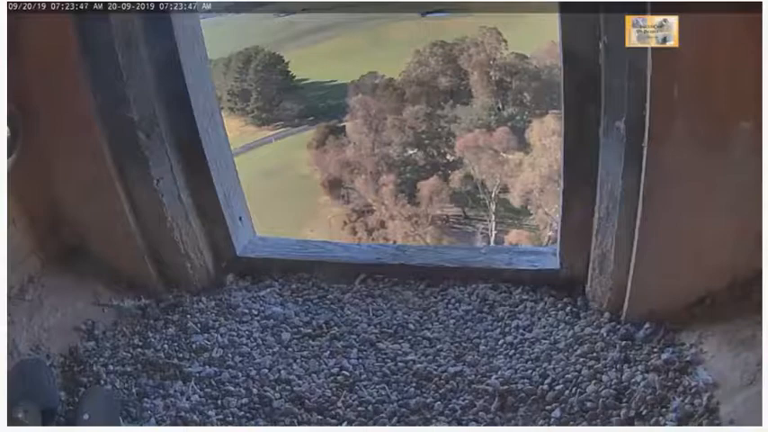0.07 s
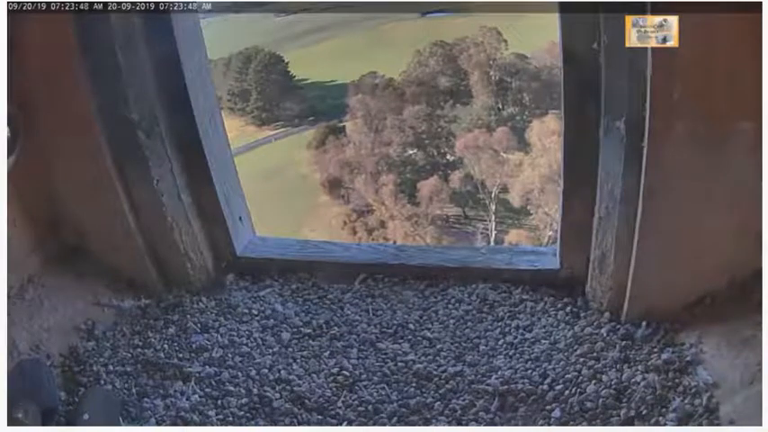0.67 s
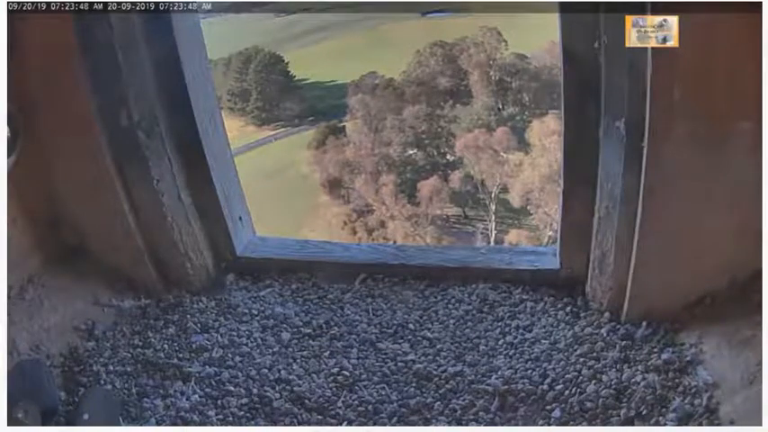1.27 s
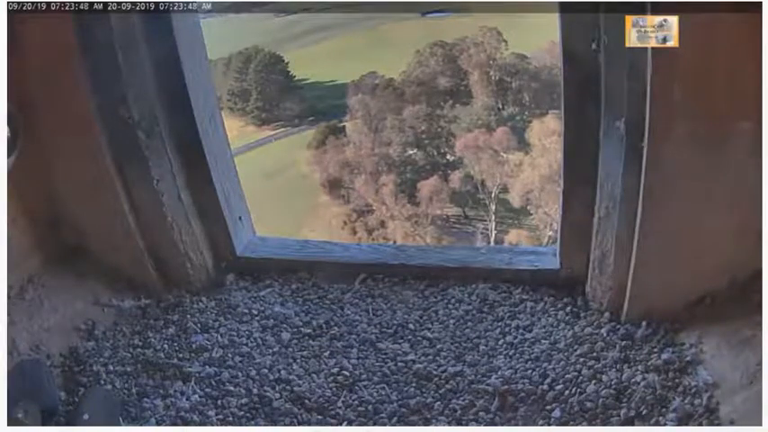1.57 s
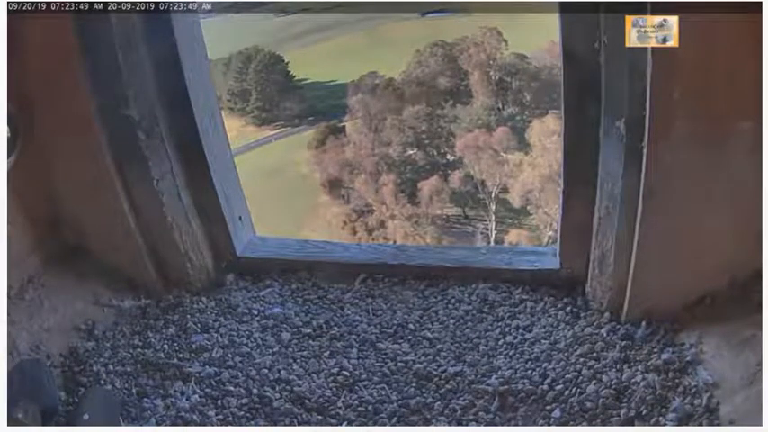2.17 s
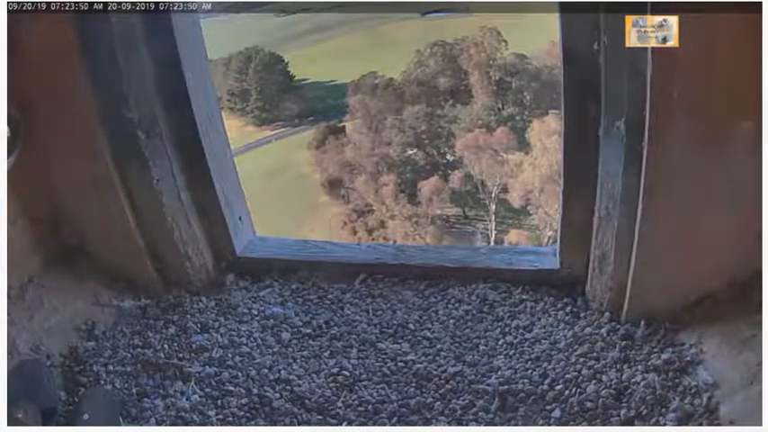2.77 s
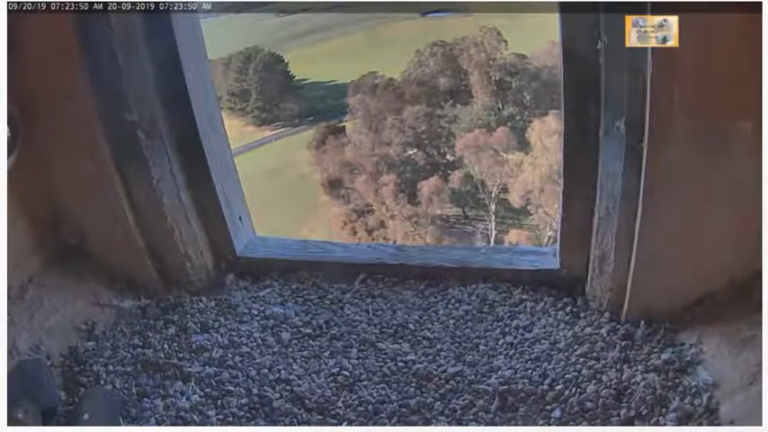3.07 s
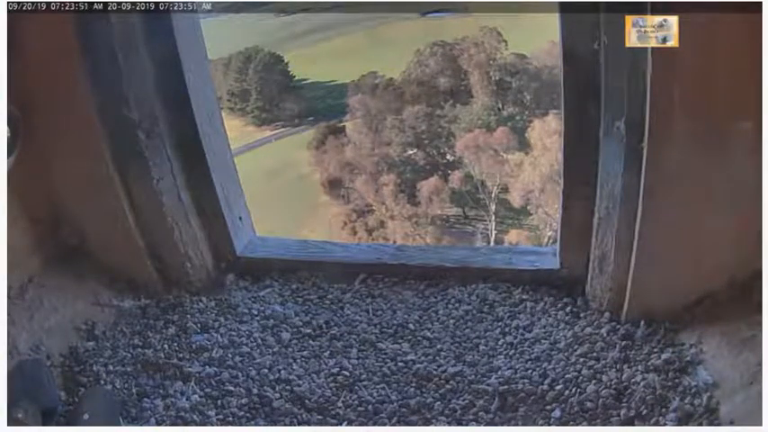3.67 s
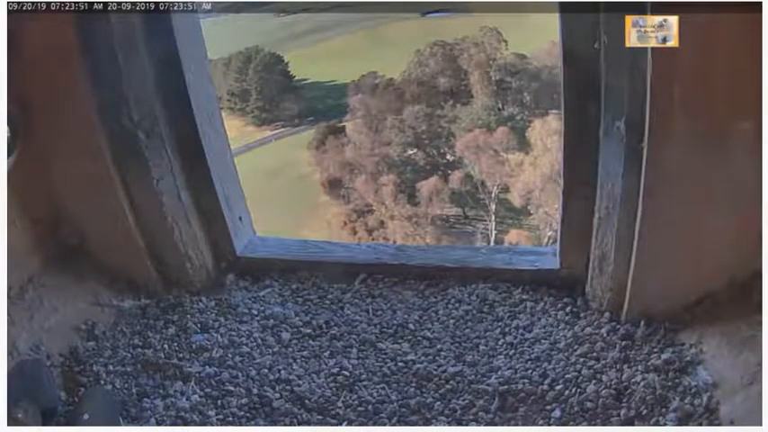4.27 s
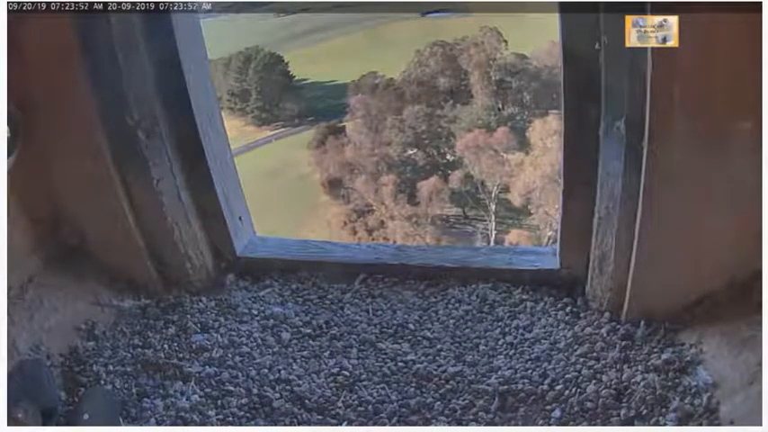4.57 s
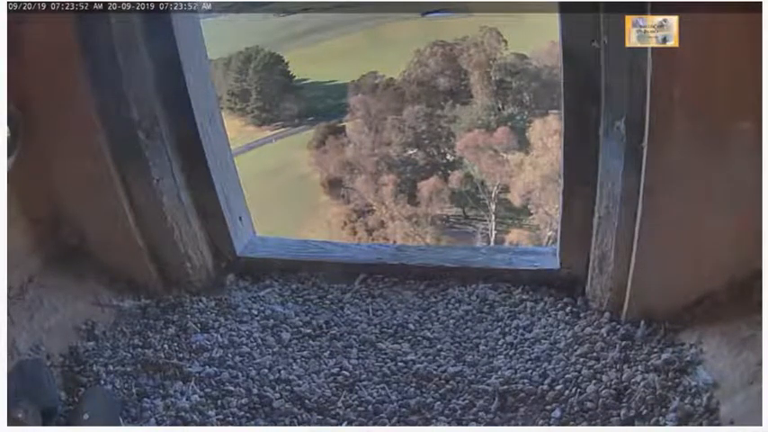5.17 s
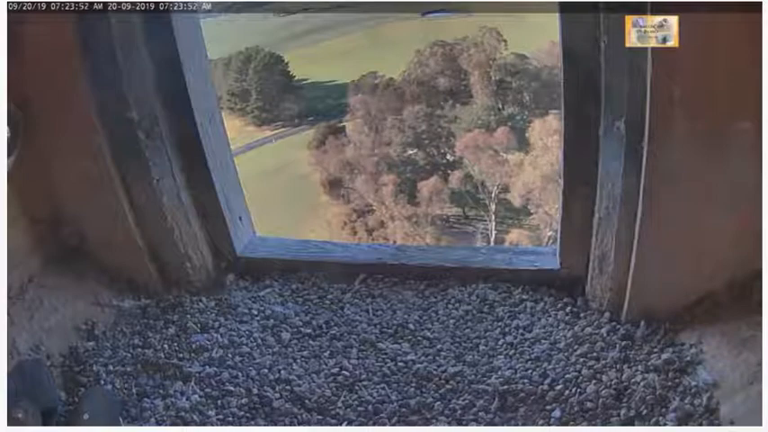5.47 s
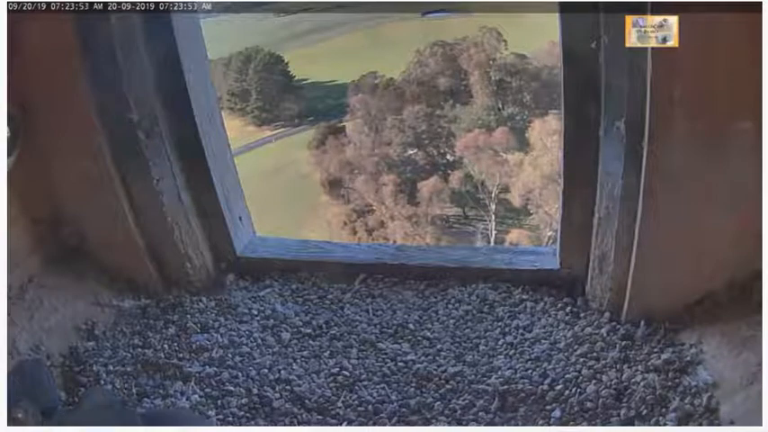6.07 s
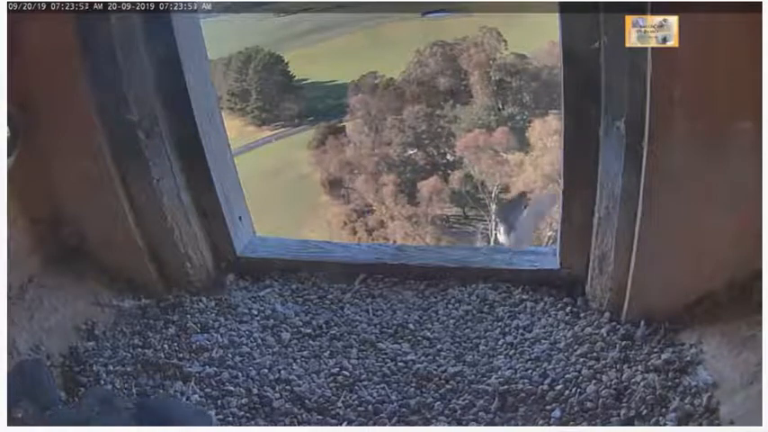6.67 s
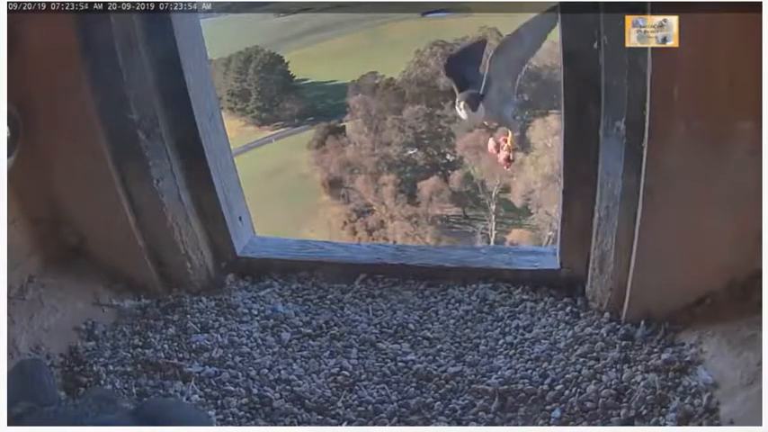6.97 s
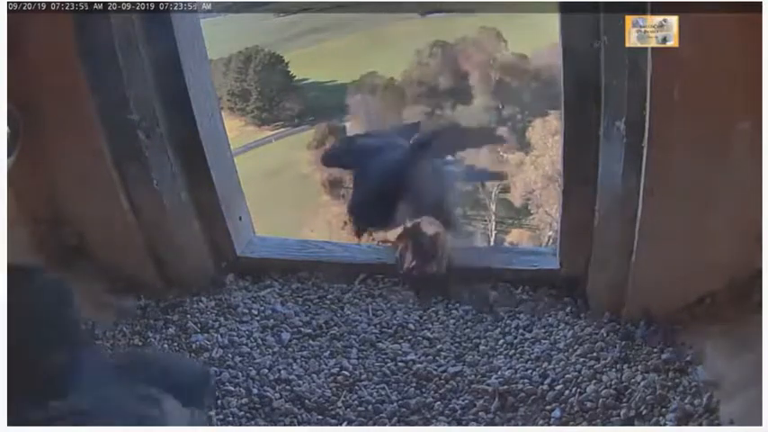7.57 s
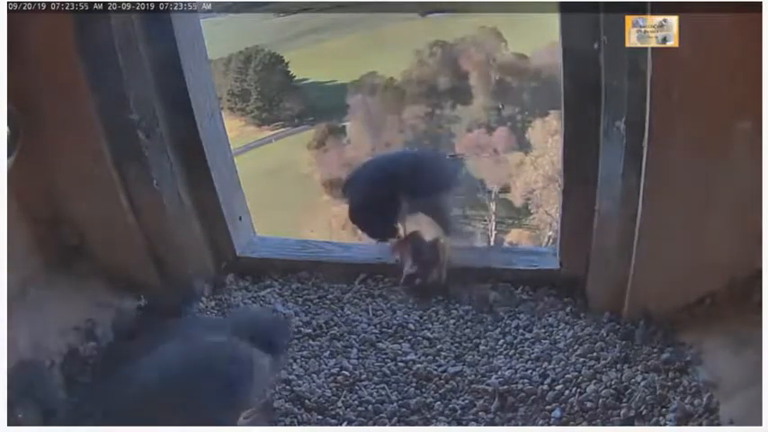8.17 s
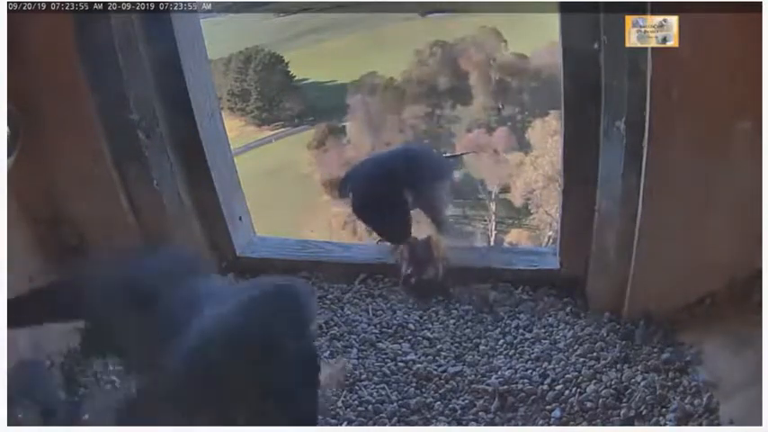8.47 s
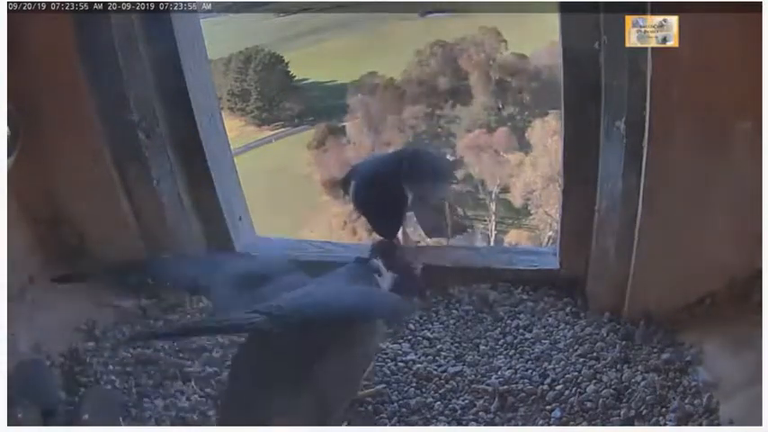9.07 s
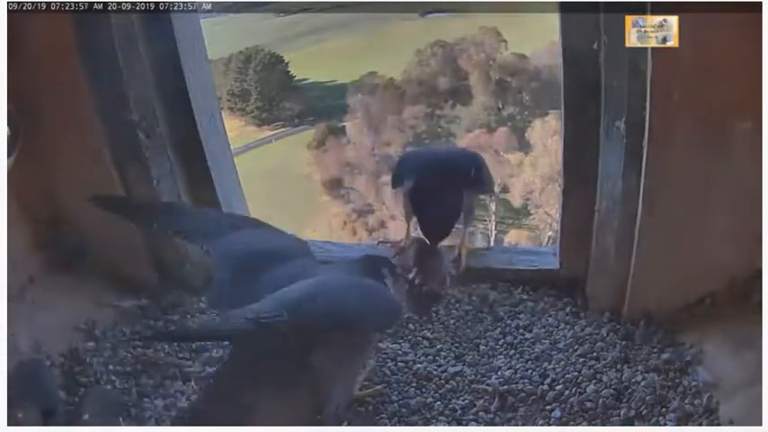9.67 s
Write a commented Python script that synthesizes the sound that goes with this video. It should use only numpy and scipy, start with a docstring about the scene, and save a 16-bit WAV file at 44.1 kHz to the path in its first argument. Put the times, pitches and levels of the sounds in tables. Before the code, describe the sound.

Heard from inside an outdoor nest box, wind rumbles under a thin hiss while a far bird whistles faintly among trees. Well past halfway, a wavering falcon wail grows into a run of yelps, with thumps of wing beats and a hollow landing note. Sharp falling chups, thin squeaks, hoarse grunts and scuffs from two falcons follow close to the microphone, closing with a brief falling squeal.

```python
"""At a nest box among trees, a falcon wails and yelps as its mate flies in and lands; then both trade
harsh, squeaky chups. Each call is a vibration of the syrinx filtered by the throat; many begin or end
in a low gliding grunt, and the modes of the box ring on after them. Wings buffet the microphone with
swells of pressure, hoarse rasps and scuffs come as grainy bursts of noise, and a far bird's whistle
echoes from the trees. Under it all lie wind rumble and hiss."""
import sys
import numpy as np
from scipy import signal
from scipy.fft import rfft, irfft, next_fast_len
from scipy.io import wavfile
from scipy.ndimage import uniform_filter1d

SR = 44100
rng = np.random.default_rng(int(sys.argv[2]) if len(sys.argv) > 2 else 0)


def bounce(signal):
    """Save signal as a 16-bit WAV file at the path given by the first command-line argument."""
    frames = np.transpose(np.atleast_2d(signal))
    limited = np.clip(frames, -1, 1)
    pcm = np.round(limited * 32767).astype(np.int16)
    wavfile.write(sys.argv[1], SR, pcm)


N = 433503
TIME = np.arange(N) / SR


# the long wail: (time [s], pitch [Hz], level [dB], overtones [dB], roughness [0-1])
WAIL = [(6.62, 1116, -50, 1, 0.2), (6.636, 1124, -39.5, -12, 0.2), (6.692, 1063, -48, 5.5, .22),
        (6.71, 1119, -41, -13.5, 0.3), (6.722, 1138, -62.5, 7, 0.5), (6.742, 1089, -36.5, -5.5, .05),
        (6.81, 1082, -45, 7, .24), (6.85, 1109, -31, -10, .13), (6.89, 1088, -36.5, 6, .15),
        (6.96, 1095, -33.5, 3, 0.19), (6.98, 1153, -26.5, -11, 0.01), (7.004, 1161, -29.5, -5.5, 0.1),
        (7.018, 1282, -36.5, 3, 0.1), (7.036, 1095, -28, 1, .05), (7.05, 1072, -39, 3, .15)]
# yelps: (start [s], crest [s], pitch [Hz], final lift [share of pitch], held level [dB],
# added crest [dB], overtones [dB], roughness [0-1])
YELPS = [(7.155, 7.259, 1112, .18, -31.5, -18.5, 0, .16), (7.309, 7.359, 1097, 0.19, -33, -23.5, 2, .17),
         (7.412, 7.432, 1109, 0.053, -33.5, -35, -10, .18), (7.513, 7.54, 1189, -.08, -34, -33, -9.5, 0.1),
         (7.543, 7.573, 1096, 0.089, -35.5, -27.5, 0.5, 0.3),
         (7.644, 7.688, 1096, .14, -36.5, -24.5, 5, .2), (7.755, 7.783, 1093, .14, -35, -25.5, 6.5, 0.26),
         (7.852, 7.869, 1105, .018, -34, -40.5, 8, 0.3), (8.052, 8.073, 1208, .076, -34.5, -42.5, 2.5, .25),
         (8.365, 8.399, 1153, 0.19, -31, -36, 1.5, 0.33), (9.131, 9.153, 1221, .06, -40.5, -35, 10.5, 0.2)]
# faint wails: (start [s], length [s], first pitch [Hz], last pitch [Hz], level [dB], roughness [0-1])
APPROACH_WAILS = [(6.266, 0.15, 1006, 1044, -54.5, .13), (6.419, 0.1, 990, 1022, -53, 0.4)]
# spectra of the throat and of its rasp: (frequency [Hz], gain [dB])
WAIL_THROAT = [(2000, -8), (2350, -10.5), (2900, -11.5), (3300, -27.5), (3650, -13.5), (4000, -26.5),
               (4500, -7.5), (5500, -28), (6600, -19), (7600, -60.5)]
WAIL_RASP = [(700, -11), (950, -19.5), (1300, 15), (1700, -6), (1950, -0.5), (2400, 10), (3000, 0.5),
             (3500, -4), (4000, 2), (4600, -2.5), (5100, -19), (5700, -1.5), (6700, -5), (7800, -30)]
def wails():
    """Biphonation: the two sides of the syrinx sing different pitches, making wails and yelps harsh."""
    approach = [sweep(*row, bright_db=1.5, settle=.41, crest=.98, ends_db=-9.5, fray=.24)
                for row in APPROACH_WAILS]
    faint = syrinx(approach, WAIL_THROAT, jitter=.034, flutter_hz=150, rasp_db=-7, edge_s=.0081,
                   second_db=-4)
    calls = [WAIL] + [yelp(*row) for row in YELPS]
    loud = syrinx(calls, WAIL_THROAT, jitter=.034, flutter_hz=200, rasp_db=2, edge_s=.008,
                  second_db=-21, rasp_colour=WAIL_RASP, stutter=.45)
    return ragged(faint + loud, patch_db=2.5)


def yelp(start, crest_s, hz, lift, held_db, crest_db, bright_db, rough, scoop=.13, end_s=.02):
    """Pitch and amplitude contour: a yelp scoops down to a note, brightens, swells, flips and frays."""
    s = np.linspace(start, crest_s + end_s, 60)
    onset = np.exp(-(s - start) / .01088)
    ending = np.clip((s - crest_s) / end_s, 0, 1)
    flip = .5 + .5 * np.tanh((s - crest_s - .0012) / .012)
    swell_db = 20 * np.log10(1 + amp(crest_db - held_db) * np.exp(-((s - crest_s) / .0068) ** 2))
    db = held_db + swell_db - 12.5 * (np.exp(-(s - start) / .0037) + ending ** 2)
    overtones_db = bright_db - .09 * swell_db - 15.5 * onset  # the crest favours the fundamental
    pitch = hz * (1 + scoop * onset + lift * flip)
    return np.c_[s, pitch, db, overtones_db, rough + .63 * (onset / 4 + ending)]


# chups: (start [s], length [s], first pitch [Hz], last pitch [Hz], level [dB], roughness [0-1],
# overtones [dB], easing [0 = even glide])
CHUPS = [(7.435, 0.036, 2290, 2040, -30, 0.2, -4.5, 0.89), (7.909, 0.018, 4864, 3525, -15, 0.15, 1, 3.2),
         (7.922, 0.017, 2515, 2288, -22, 0.1, -0.5, 1.4), (8.075, 0.028, 3640, 2930, -35.5, 0.4, 10.5, 1.2),
         (8.123, 0.021, 4790, 4300, -15, 0.13, -5, 2.1), (8.138, 0.022, 2812, 2508, -17, 0.04, -7, 1.8),
         (8.45, 0.0072, 5070, 4850, -20.5, 0.07, -13, 0.67), (8.454, 0.034, 3020, 2549, -20.5, 0.08, 7, 1),
         (8.532, 0.041, 3480, 3174, -41.5, 0.7, 4, 1.1), (8.788, 0.016, 3680, 3000, -34.5, 0.3, 10.5, 1.1),
         (8.802, .028, 2780, 2403, -19, .09, 3, 0.99), (8.971, 0.034, 3336, 2792, -32.5, 0.2, 14, 0.42),
         (9.133, 0.024, 2610, 2802, -25.5, 0.08, -11, 0.84), (9.331, 0.023, 4980, 3620, -19.5, 0.25, 0, 2),
         (9.345, 0.028, 2583, 2317, -23.5, 0.16, -3, 1.7)]
# thin squeaks: (start [s], length [s], first pitch [Hz], last pitch [Hz], level [dB], roughness [0-1])
SQUEAKS = [(4.865, 0.046, 2580, 2620, -68, .3), (7.882, 0.012, 5580, 5680, -26.5, 0),
           (8.385, 0.048, 4980, 5460, -35, 0.2), (8.736, 0.049, 4870, 5240, -40.5, .15),
           (8.765, 0.038, 3680, 3850, -33.5, 0.1), (8.951, 0.013, 3570, 3900, -38, 0.1),
           (9.154, 0.062, 4950, 5000, -29.5, 0), (9.213, 0.023, 4980, 5350, -42.5, 0),
           (9.228, 0.027, 5660, 5610, -38.5, .05), (9.736, 0.0099, 5650, 5580, -33, 0),
           (9.75, 0.044, 4950, 5210, -36, 0.06), (9.794, 0.014, 5490, 5500, -36, 0)]
# throat response: (frequency [Hz], gain [dB])
CHUP_THROAT = [(4700, -1), (5700, -4.5), (6400, -15.5), (7100, -6.5), (7600, -25.5), (9000, -48)]
def chups(chips_from_s=1.835, chips_every_s=.2):
    """Fast frequency sweeps: mostly falling chups, mostly rising squeaks and faint regular chips."""
    falls = [sweep(*row, crest=.54, ends_db=-12, fray=.36, dull_db=-8) for row in CHUPS]
    squeaks = [sweep(*row, bright_db=-19, settle=.27, crest=.17, ends_db=0, fray=.12) for row in SQUEAKS]
    chips = [sweep(chips_from_s + k * chips_every_s, length=.014, first_hz=4420, last_hz=4010, db=db,
                   rough=.43, bright_db=-30, settle=1.3, crest=.35, ends_db=7, fray=.2)
             for k, db in enumerate(rng.normal(-70.5, 7.5, 13))]
    return syrinx(falls + squeaks + chips, CHUP_THROAT, jitter=.055, flutter_hz=376, rasp_db=-4.5,
                  edge_s=.0041, stutter=.8)


# breaks of the voice in a chup: (start [s], length [s], first pitch [Hz], last pitch [Hz], level [dB])
CRACKS = [(7.904, 0.011, 5400, 4800, -28.5), (7.9168, .006, 4100, 3760, -20),
          (8.124, 0.0061, 5730, 5150, -28), (8.14, 0.011, 5600, 5120, -21.5),
          (8.799, 0.014, 5420, 5070, -23), (8.963, 0.011, 5200, 4900, -34), (8.983, 0.017, 4530, 3800, -35),
          (9.147, 0.011, 5100, 6000, -33.5), (9.331, 0.0072, 5820, 4670, -26.5)]
def cracks(snaps_per_s=1100, snap_s=.0018, scatter=.063, uneven_db=2):
    """Impulse excitation: the syrinx rattles in irregular snaps, each ringing near a gliding pitch."""
    out = np.zeros(N)
    for s, length, first_hz, last_hz, db in CRACKS:
        t = np.arange(0, length + 4 * snap_s, 1 / SR)
        count = max(round(length * snaps_per_s), 1)
        late, detune, size = rng.standard_normal((count, 3)).T[:, :, None]
        progress = np.clip((np.arange(count)[:, None] + np.tanh(late) / 2) / count, 0, 1)
        age = np.maximum(t - progress * length, 0)
        hz = first_hz * (last_hz / first_hz) ** progress * (1 + scatter * detune)
        snaps = amp(uneven_db * size) * age * np.exp(-2 * age / snap_s) * np.sin(2 * np.pi * hz * age)
        add(out, s, amp(db) * unit(snaps.sum(0)) * np.sqrt(length / t[-1]))
    return out


# the closing squeal: (time [s], pitch [Hz], level [dB], overtones [dB], roughness [0-1])
SQUEAL = [(9.694, 1335, -24, -15, 0.1), (9.712, 1243, -20.5, 8, 0.11), (9.735, 1227, -30.5, 3, 0),
          (9.75, 1124, -37, 3, 0.16), (9.765, 1126, -48, -2, 0)]
# throat response: (frequency [Hz], gain [dB])
SQUEAL_THROAT = [(2400, -34.5), (3700, -25), (4900, -15), (5250, -23), (5600, 12.5), (6200, -12.5),
                 (7300, -19), (8000, -62)]
def squeal():
    """Formant filtering: a sharp throat resonance picks out high overtones of a falling note."""
    return syrinx([SQUEAL], SQUEAL_THROAT, jitter=.015, flutter_hz=250, rasp_db=-10, edge_s=.0065)


# croaks: (start [s], length [s], first pitch [Hz], last pitch [Hz], level [dB], roughness [0-1],
# overtones [dB])
CROAKS = [(7.262, 0.023, 623, 513, -43.5, 0.3, -5.5), (7.357, .024, 646, 536, -39, 0.3, -4.5),
          (7.577, 0.023, 591.5, 532, -45.5, 0.4, 7), (7.692, .03, 594, 524, -45.5, 0.1, 5),
          (7.784, .034, 638, 531.5, -42.5, .3, 3.5), (7.929, .018, 685, 555, -41, 0.4, 5),
          (8.158, .018, 606, 562, -47.5, 0.4, 0.5), (8.486, 0.018, 695, 531, -41.5, 0.4, 1),
          (8.708, 0.018, 960, 1040, -39, 0.3, -8), (8.802, .03, 1354, 1178, -31.5, 0.3, -11.5),
          (8.986, 0.02, 1412, 1340, -39, .2, -15), (9.129, .018, 466, 565, -50, 0.3, 4),
          (9.675, .019, 460, 628, -36.5, 0.4, 0)]
# throat response: (frequency [Hz], gain [dB])
CROAK_THROAT = [(900, 10), (1250, 1), (1450, 3.5), (1660, 9), (1900, -3.5), (2400, -2.5), (3600, -8.5),
                (5000, -6), (7600, -25.5)]
def croaks():
    """Register change: the voice drops into a hoarse low vibration at the edge of a call."""
    calls = [sweep(*row, settle=.89, crest=.22, ends_db=-8.5, fray=.13) for row in CROAKS]
    return syrinx(calls, CROAK_THROAT, jitter=.081, flutter_hz=120, rasp_db=-12, edge_s=.006)


def sweep(start, length, first_hz, last_hz, db, rough, bright_db, settle, crest, ends_db, fray,
          dull_db=0):
    """Eased frequency glide; away from the crest, the level shifts by ends_db and roughness grows."""
    progress = np.linspace(0, 1, 30)
    crest = np.clip(crest, .1, .9)
    glide = np.expm1(-settle * progress) / np.expm1(-settle)
    hz = first_hz * (last_hz / first_hz) ** glide
    away = np.maximum(1 - progress / crest, (progress - crest) / (1 - crest)) ** 2
    overtones_db = bright_db + dull_db * (progress - .5)
    return np.c_[start + length * progress, hz, db + ends_db * away, overtones_db, rough + fray * away]


# spectrum of rasping air: (frequency [Hz], gain [dB])
RASP = [(700, 0), (950, -19.5), (1300, 10.5), (1700, -17.5), (1950, -15.5), (2400, -2), (2850, 2),
        (3500, -0.5), (4000, -8), (4600, -0.5), (5100, -14), (5700, 9), (7000, -2), (7800, -31.5)]
def syrinx(calls, throat, jitter, flutter_hz, rasp_db, edge_s, second_db=-np.inf, rasp_colour=RASP,
           stutter=0, stutter_hz=170):
    """Source and filter: the throat shapes a harmonic tone; roughness shakes it and adds a rasp."""
    out, air = np.zeros(N), ragged(noise(rasp_colour))
    for rows in calls:
        s, *columns = np.transpose(rows)
        t = np.arange(s[0] - edge_s / 2, s[-1] + edge_s / 2, 1 / SR)
        size = len(t)
        hz, db, bright_db, rough = (np.interp(t, s, c) for c in columns)
        rough = np.clip(rough, 0, 1)
        quaver = .04 * rough * wander(size, 70)
        phase = phase_of(hz * (1 + quaver + jitter * rough * wander(size, flutter_hz)))
        two_voices = 1 + amp(second_db) * np.exp(.25j * phase)  # the other side sings 25% higher
        tone, power = np.zeros((2, size))
        for k in range(1, 8):
            gain = 1 if k == 1 else amp(bright_db) * colour(throat, k * hz) * (k * hz < SR / 4)
            shake = (wander(size, flutter_hz) + 1j * wander(size, flutter_hz)) / np.sqrt(2)
            hoarse = np.minimum(rough * np.sqrt(k), 1)  # high overtones break up first
            strength = np.sqrt(1 - hoarse ** 2) + hoarse * shake
            tone += np.sqrt(2) * gain * (strength * two_voices * np.exp(1j * k * phase)).real
            power += gain ** 2
        puffs = (1 + .5 * np.cos(phase)) * np.resize(air[int(s[0] * SR):], size)
        rasp = amp(rasp_db) * rough * np.sqrt(power) * puffs
        fade = np.sin(np.pi / 2 * np.clip(np.minimum(t - t[0], t[-1] - t) / edge_s, 0, 1)) ** 2
        spurt_phase = phase_of(stutter_hz * (1 + .35 * wander(size, stutter_hz)))
        spurts = unit(1 + np.minimum(stutter * rough, 1) * np.cos(spurt_phase))
        add(out, t[0], amp(db) * fade * spurts * (tone + rasp))
    return out


# rising and falling grunts: (middle [s], length [s], pitch [Hz], level [dB])
WIND_UPS = [(7.656, 0.037, 244.6, -28), (7.763, .03, 277.5, -26.5), (7.838, 0.07, 273.4, -24),
            (8.056, .021, 287, -30), (8.343, .045, 261, -22), (8.753, .035, 270, -18.5),
            (9.135, .026, 372, -31), (9.329, 0.026, 266, -12), (9.68, .022, 444, -24.5)]
RUN_DOWNS = [(7.588, 0.031, 304, -28.5), (7.616, 0.055, 302, -27.5), (7.711, 0.04, 305, -26.5),
             (7.807, .019, 277, -23), (7.916, 0.039, 200, -17.5), (8.123, 0.029, 239.6, -17),
             (8.411, 0.065, 232, -17.5), (8.502, .033, 310, -25), (8.572, .038, 236, -19),
             (8.838, .062, 225.5, -16), (9.021, 0.05, 237, -18), (9.383, 0.069, 307, -23),
             (9.404, 0.056, 248, -15)]
# throat response: (frequency [Hz], gain [dB])
GRUNT_THROAT = [(300, -54), (700, -18.5), (1250, 10), (1650, -9), (2100, -8.5), (6000, 0), (8000, -34.5)]
def grunts(up_octaves=.52, down_octaves=-1.4, overtones_db=-27, air_db=-28, peak_db=7):
    """Slack, uneven vibration speeds up into a call or runs down after it, releasing puffs of air."""
    out, air = np.zeros(N), noise(GRUNT_THROAT)
    for table, octaves in (WIND_UPS, up_octaves), (RUN_DOWNS, down_octaves):
        for s, length, hz, db in table:
            size = int(length * SR)
            glide = octaves * np.linspace(-.5, .5, size) + .13 * wander(size, 92)
            phase = phase_of(hz * 2 ** glide)
            overtones = sum(colour(GRUNT_THROAT, k * hz) * (1 + .5 * wander(size, 120))
                            * np.sin(k * phase) for k in range(2, 10))
            swell = np.hanning(size) * amp(peak_db * (np.bartlett(size) - .97))
            puffs = unit((1 + .5 * np.cos(phase)) * np.resize(air[int(s * SR):], size))
            voice = np.sqrt(2) * np.sin(phase) + amp(overtones_db) * unit(overtones) + amp(air_db) * puffs
            add(out, s - length / 2, amp(db) * swell * voice)
    return out


# pushes of air: (middle [s], length [s], pitch [Hz], level [dB])
BUFFETS = [(7.326, .07, 38.2, -19), (7.37, 0.038, 42.4, -29), (7.413, .03, 181, -24.5),
           (7.43, .13, 181.3, -27), (7.464, .045, 276, -33.5), (7.519, .04, 277.6, -29),
           (7.437, .11, 52.4, -27), (7.59, .1, 49.5, -26.5), (7.288, .14, 119.3, -31.5),
           (7.558, .045, 187.6, -26.5), (7.74, 0.18, 144.8, -41)]
def buffets(unevenness=.27):
    """Air displacement: wing beats and the landing make short, uneven swells of pressure."""
    out = np.zeros(N)
    for s, length, hz, db in BUFFETS:
        size = int(length * SR)
        phase = phase_of(hz * (1 + unevenness * wander(size, hz)))
        add(out, s - length / 2, amp(db) * np.sqrt(2) * np.hanning(size) * np.sin(phase))
    return out


def landing(middle_s=7.302, length_s=.048, hz=289.6, db=-19):
    """A tone burst: one short hollow note as the bird touches down."""
    t = TIME - middle_s
    swell = np.cos(np.pi * np.clip(t / length_s, -.5, .5)) ** 2
    return amp(db) * np.sqrt(2) * swell * np.sin(2 * np.pi * hz * t)


# short bursts of noise: (middle [s], length [s], level [dB])
BURSTS = [(4.904, 0.15, -64), (7.292, 0.1, -34.5), (7.802, .022, -32.5), (7.941, 0.036, -33.5),
          (8.103, 0.026, -29), (8.169, 0.028, -30.5), (8.345, .03, -37), (8.503, 0.025, -32.5),
          (8.56, 0.097, -40), (8.757, .04, -41), (8.817, 0.058, -32.5), (9.013, .06, -36),
          (9.377, .08, -31.5)]
# their spectrum: (frequency [Hz], gain [dB])
BURST_COLOUR = [(100, -21.5), (300, 13), (750, -6.5), (1300, 8), (1660, 3), (2000, 3), (2600, 4),
                (3200, -11.5), (3700, 0.5), (4200, -13.5), (5600, -13), (6900, -14.5), (7800, -37)]
def rasps_and_scuffs(grain_db=2):
    """Gated broadband noise: short grainy bursts, heard as hoarse rasps at the calls and as scuffs."""
    envelope = np.zeros(N)
    for s, length, db in BURSTS:
        add(envelope, s - length / 2, amp(db) * np.hanning(int(length * SR)))
    return envelope * ragged(noise(BURST_COLOUR)) * unit(amp(grain_db * wander(N, 280)))


# response of the box: (frequency [Hz], gain [dB])
BOX_COLOUR = [(500, 2.5), (780, -15), (950, -11), (1100, 0.5), (1400, -2), (1660, -3), (1900, -14.5),
              (2300, -2), (7000, 3), (7700, -9.5)]
# its modes: (frequency [Hz], width [Hz], gain [dB])
BOX_MODES = [(1270, 290, -4.5), (1640, 77, -2.5), (2433, 210, 0.5), (2720, 260, -1), (3044, 73, 16.5),
             (3620, 210, 1.5), (3900, 170, -9), (4570, 170, -6.5), (4950, 110, -9.5), (5650, 260, 2)]
# first wall reflections: (delay [s], gain [ratio])
BOUNCES = [(.0019, -0.096), (.0043, 0.035), (.0074, .17), (0.01, -0.16)]
def box(x, ring_db=-10, ring_t60=1.0, walls_db=-13, walls_t60=.0043):
    """Reflection and resonance: close walls colour and smear a sound, and narrow modes ring on."""
    x = filtered(x, BOX_COLOUR)
    t, f = np.arange(SR) / SR, np.fft.rfftfreq(SR, 1 / SR)
    tail = unit(rng.standard_normal(SR) * amp(-60 * t / ring_t60)) / np.sqrt(SR)
    ring = irfft(rfft(tail) * peaks(BOX_MODES, f), SR) * (1 - t)
    walls = unit(rng.standard_normal(SR) * (t > .002) * amp(-60 * t / walls_t60)) / np.sqrt(SR)
    echo = amp(ring_db) * ring + amp(walls_db) * walls
    for s, gain in BOUNCES:
        add(echo, s, np.array([gain]))
    return x + signal.fftconvolve(x, echo)[:N]


def boom(x, db=-9, hz=185, t60=.044):
    """Cavity resonance: the air in the box swings in its lowest mode."""
    t = np.arange(SR // 2) / SR
    decay = amp(-60 * t / t60)
    mode = 2 * decay / decay.sum() * np.cos(2 * np.pi * hz * t)
    return x + amp(db) * signal.fftconvolve(x, mode)[:N]


# spectrum of the click: (frequency [Hz], gain [dB])
TICK_COLOUR = [(300, 3), (1000, 2), (3000, -12), (7000, -17)]
def tick(time_s=5.145):
    """A filtered impulse: one small dry click."""
    click = np.zeros(N)
    click[round(time_s * SR)] = amp(-19.5)
    return filtered(click, TICK_COLOUR)


# whistles: (start [s], length [s], first pitch [Hz], held pitch [Hz], level [dB])
FAR_WHISTLES = [(0.303, .235, 1385, 1370, -55), (0.569, 0.31, 1370, 1371, -53.5),
                (.74, 0.26, 1515, 1500, -69), (1.64, 0.19, 1420, 1276, -44)]
def far_bird(edge_share=.29, settle_s=.038, bright_db=-32, rough=.073, flutter_db=1.2):
    """Amplitude fluctuation: moving air makes far whistles flutter as they slide onto their notes."""
    calls = []
    for start, length, first_hz, held_hz, db in FAR_WHISTLES:
        t = np.linspace(0, length, 60)
        swell = np.clip(np.minimum(t, length - t) / (length * edge_share), .01, 1)
        hz = held_hz + (first_hz - held_hz) * np.exp(-t / settle_s)
        timbre = np.full((len(t), 2), (bright_db, rough))
        calls.append(np.c_[start + t, hz, db + 20 * np.log10(swell), timbre])
    whistles = syrinx(calls, WAIL_THROAT, jitter=.076, flutter_hz=30, rasp_db=-38.5, edge_s=.03)
    return whistles * amp(flutter_db * wander(N, 25))


# echoes from the trees: (delay [s], gain [dB])
TREE_ECHOES = [(.085, -11.5), (0.266, -20.5)]
def trees(x, tail_db=-14, tail_t60=1.7, build_s=.14):
    """Reverberation: the wood throws back two clear echoes and a soft tail."""
    t = np.arange(SR) / SR
    envelope = np.minimum(t / build_s, 1) * amp(-60 * t / tail_t60)
    echo = amp(tail_db) * unit(rng.standard_normal(SR) * envelope) / np.sqrt(SR)
    for s, db in TREE_ECHOES:
        add(echo, s, amp([db]))
    return x + signal.fftconvolve(x, echo)[:N]


# spectrum of the wind: (frequency [Hz], gain [dB])
WIND_COLOUR = [(10, 0), (25, -16), (50, -2.5), (100, -3.5), (150, -5), (192, 4), (235, -6.5), (270, -11),
               (320, -21.5), (450, -28.5), (600, -37), (900, -64), (2000, -78)]
# its strength: (time [s], level [dB])
WIND_LEVEL = [(.3, -39.5), (.7, -34.5), (1.3, -37), (2.3, -39.5), (3.3, -38), (5.2, -38.5), (5.7, -36),
              (7.1, -36), (8.2, -33), (8.7, -34.5), (9.7, -36)]
def wind(throb_db=1.5):
    """Low-frequency noise: wind rumbles and throbs, with a peak where the box booms."""
    db = np.interp(TIME, *np.transpose(WIND_LEVEL))
    return noise(WIND_COLOUR) * amp(db + throb_db * wander(N, 7.5))


# spectrum of the hiss: (frequency [Hz], gain [dB])
HISS = [(600, -14), (1000, -12), (1270, -7), (1800, -17.5), (2300, -15), (2700, -12.5), (3300, -14),
        (4200, -9), (4700, -7), (5150, -10), (5900, 4), (6400, -7), (6900, -6), (7700, -27)]
# its narrow peaks: (frequency [Hz], width [Hz], gain [dB])
WHINES = [(2718, 49, -4), (4715, 110, 3.5), (5610, 460, -1), (6170, 110, 0), (6735, 270, -2.5)]
def hiss(pulse_hz=106.4, buzz=.98, flicker_db=10):
    """Amplitude-modulated noise: narrow peaks flicker in a hiss whose treble pulses quickly."""
    grid_hz = np.arange(1000, 8000, 10)
    whine = noise(np.c_[grid_hz, 20 * np.log10(peaks(WHINES, grid_hz))])
    flicker = unit(amp(flicker_db * np.tanh(wander(N, 80))))
    whole = amp(-1) * noise(HISS) + amp(-4.5) * whine * flicker
    treble = signal.sosfiltfilt(signal.butter(4, 4000, "highpass", fs=SR, output="sos"), whole)
    pulses = np.cos(np.pi * pulse_hz * TIME) ** 8
    return amp(-57.5) * (whole - treble + unit(1 + buzz * pulses) * treble)


def amp(db):
    """Decibels to gain."""
    return 10 ** (np.asarray(db) / 20)


def unit(x):
    """Normalisation to rms 1."""
    return x / np.sqrt(np.mean(abs(x) ** 2) + 1e-20)


def phase_of(hz):
    """Phase as the integral of frequency."""
    return 2 * np.pi * np.cumsum(hz) / SR


def colour(points, hz):
    """Interpolated gain of a (frequency [Hz], gain [dB]) spectrum."""
    f, db = np.transpose(points)
    return amp(np.interp(np.log(hz + 1), np.log(f), db))


def peaks(modes, hz):
    """Summed gain of bell-shaped resonance curves."""
    return sum(amp(db) / (1 + (2 * (hz - centre) / width) ** 2) for centre, width, db in modes)


def filtered(x, points):
    """Zero-phase filtering by a given spectrum."""
    size = next_fast_len(N + 4096)
    return irfft(rfft(x, size) * colour(points, np.fft.rfftfreq(size, 1 / SR)), size)[:N]


def noise(points):
    """Coloured Gaussian noise of rms 1."""
    return unit(filtered(rng.standard_normal(N), points))


def wander(size, rate_hz):
    """Low-pass noise: a random curve of rms 1."""
    span = next_fast_len(size + 4096)
    f = np.fft.rfftfreq(span, 1 / SR)
    return unit(irfft(rfft(rng.standard_normal(span)) * np.exp(-(f / rate_hz) ** 2), span))[:size]


def ragged(x, patch_db=4):
    """Random modulation breaks a sound into patches of time and frequency."""
    spectra = signal.stft(x, nperseg=256, noverlap=192)[2]
    streaks = uniform_filter1d(rng.standard_normal(spectra.shape), size=6, axis=1)
    patches = unit(uniform_filter1d(streaks, size=3, axis=0))
    gain = unit(amp(patch_db * np.clip(patches, -2, 2)))
    return signal.istft(spectra * gain, nperseg=256, noverlap=192)[1][:N]


def add(mix, s, sound):
    """Superposition: mixes a sound in at time s."""
    part = mix[max(round(s * SR), 0):][:len(sound)]
    part += sound[:len(part)]


# leftward lean: (frequency [Hz], gain added left and taken from the right [dB])
LEAN = [(50, 1), (100, -1.5), (170, 5), (300, 1), (500, 0.3), (850, 0)]
def scene():
    """Level panning: grunts, landing and buffets lean mostly left; all else is in the middle."""
    in_box = box(wails() + chups() + cracks() + squeal() + croaks() + rasps_and_scuffs())
    middle = in_box + tick() + trees(far_bird()) + wind() + hiss()
    low = boom(grunts() + landing()) + buffets()
    return middle + np.array([filtered(low, [(hz, side * db) for hz, db in LEAN]) for side in (1, -1)])


def record(dry, on_s=.27, cutoff_hz=7750):
    """Offset and band limit: the microphone switches on with a step and passes no high treble."""
    offset = np.interp(TIME, [on_s, 1.0], [.03, .048])
    live = (dry + offset) * (TIME >= on_s)
    lowpass = signal.firwin(201, cutoff_hz, window=("kaiser", 7), fs=SR)
    return signal.oaconvolve(live, lowpass[None], "same")


dry = scene()
out = record(dry)
bounce(out)
```